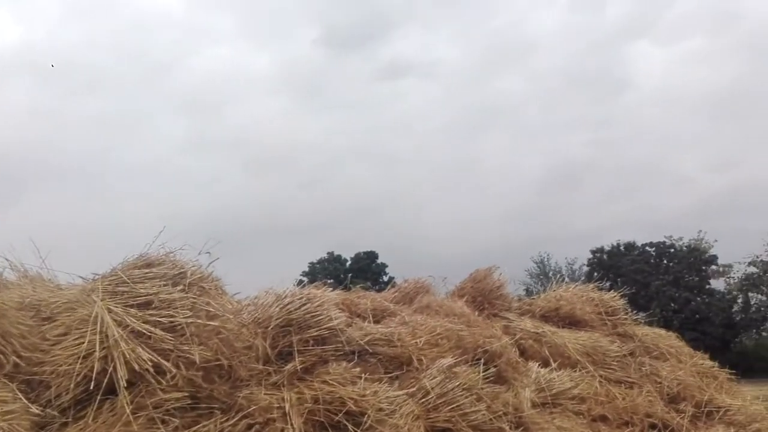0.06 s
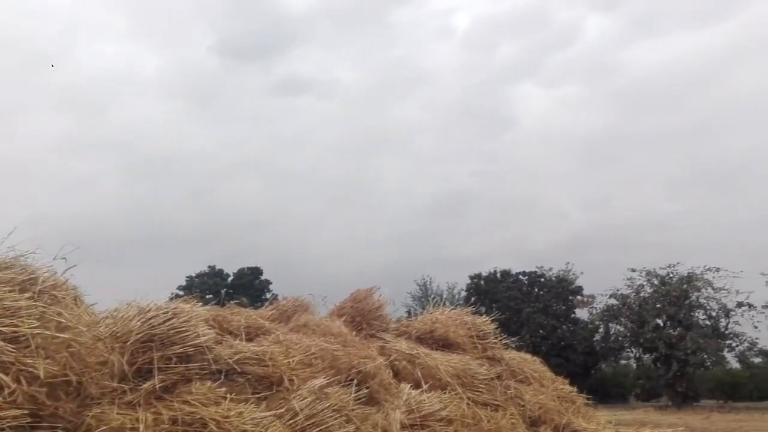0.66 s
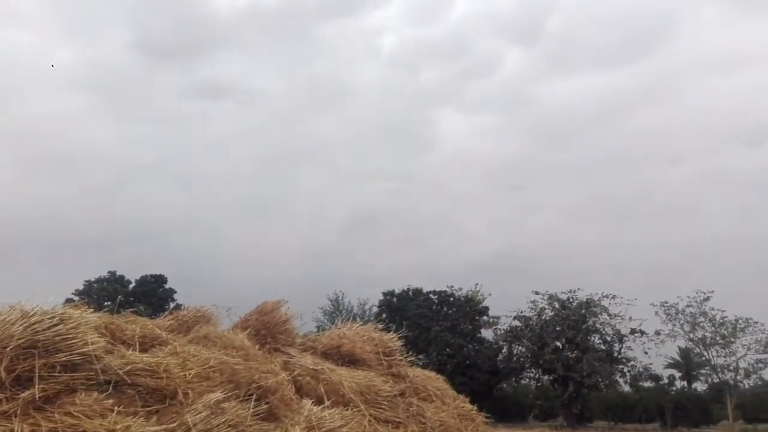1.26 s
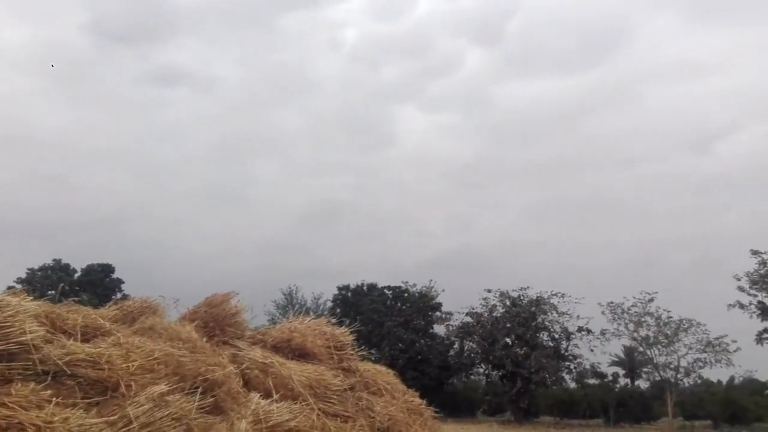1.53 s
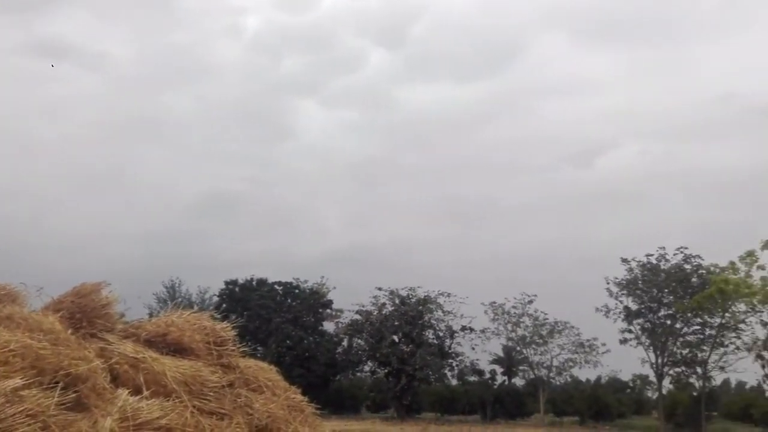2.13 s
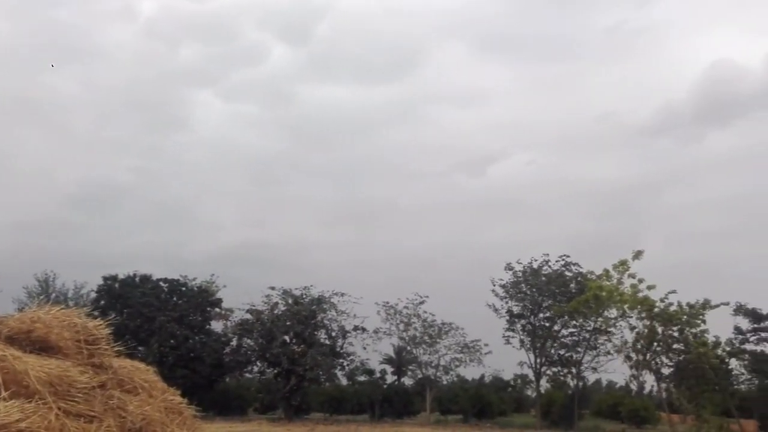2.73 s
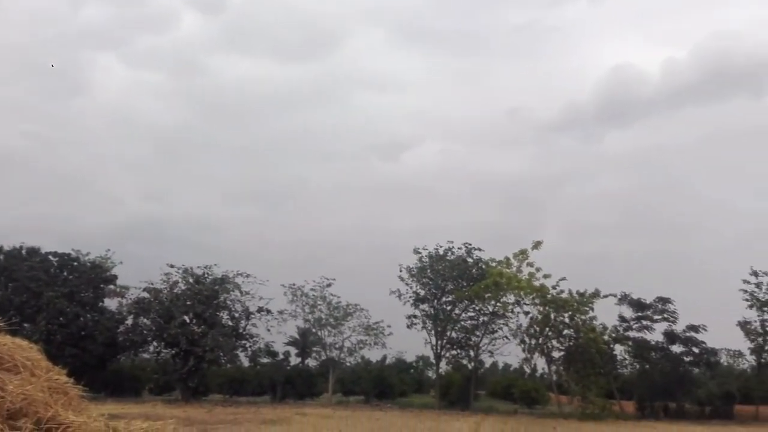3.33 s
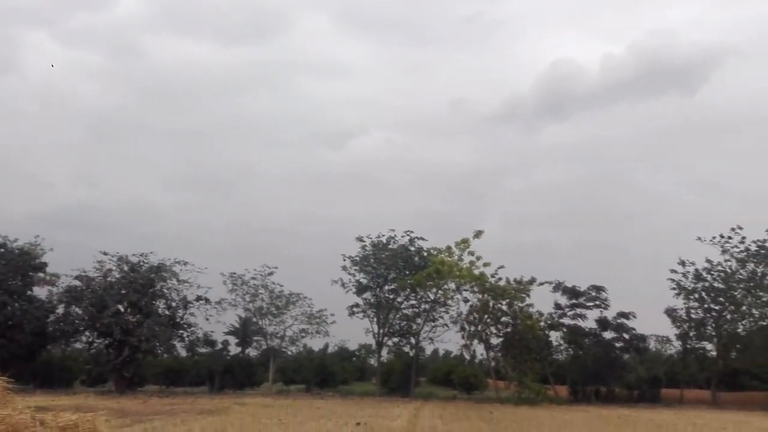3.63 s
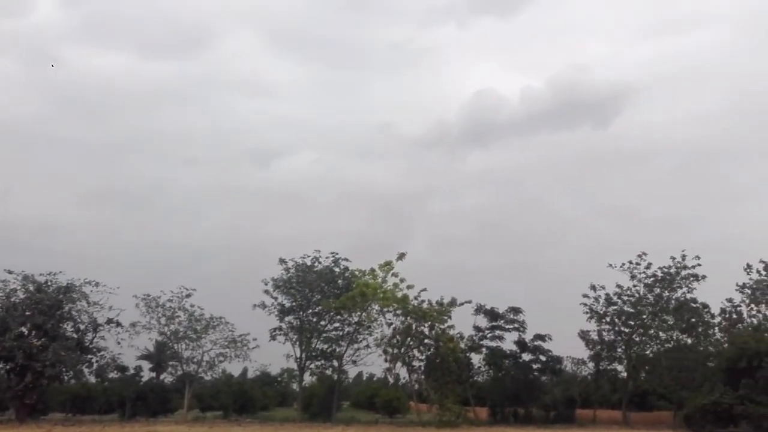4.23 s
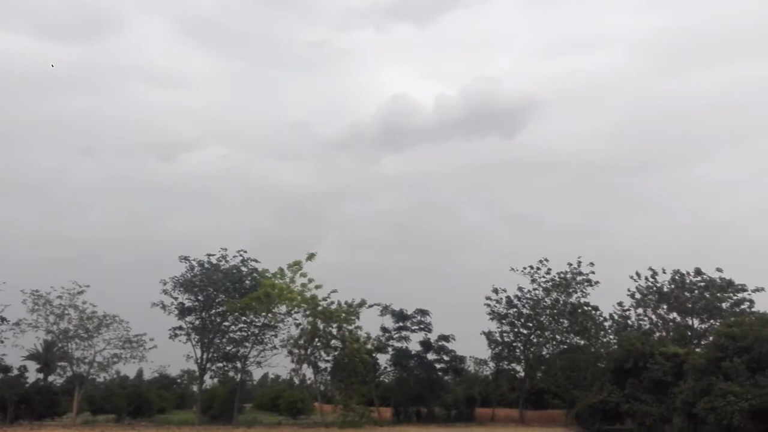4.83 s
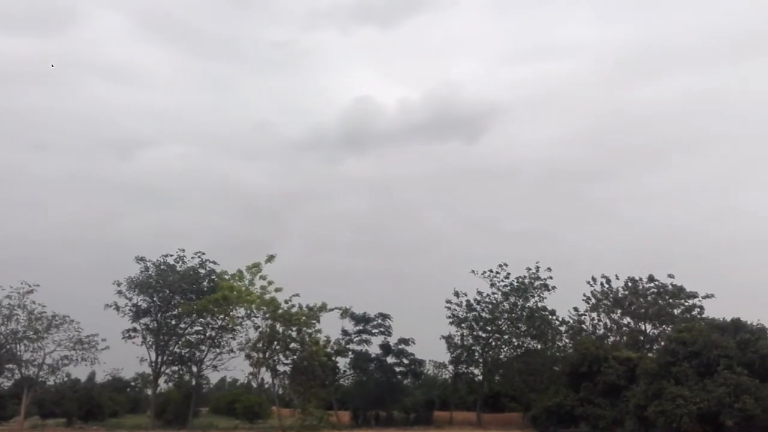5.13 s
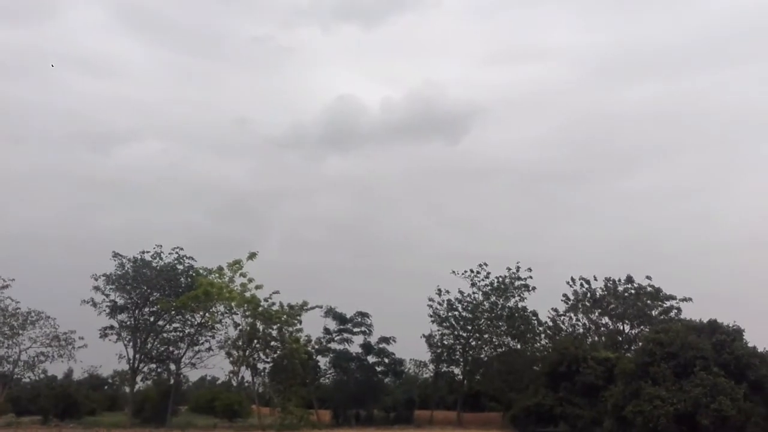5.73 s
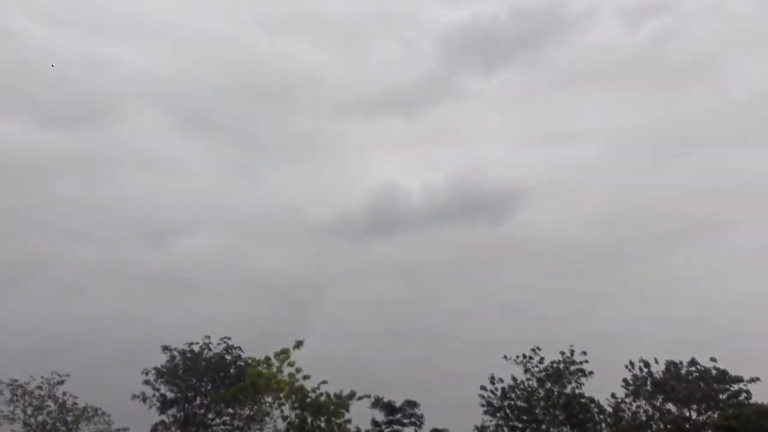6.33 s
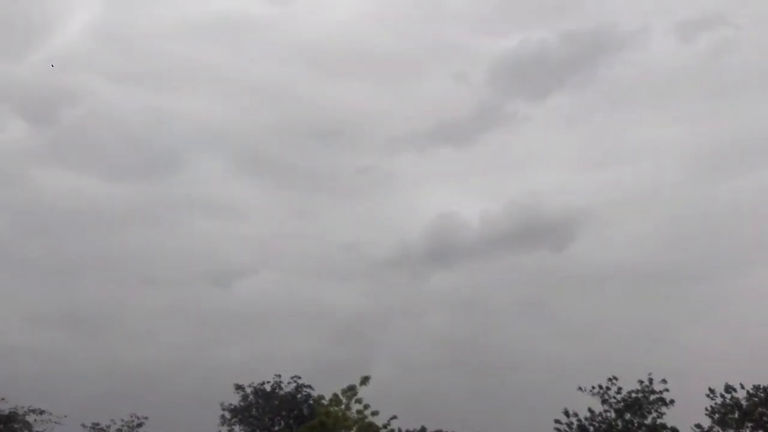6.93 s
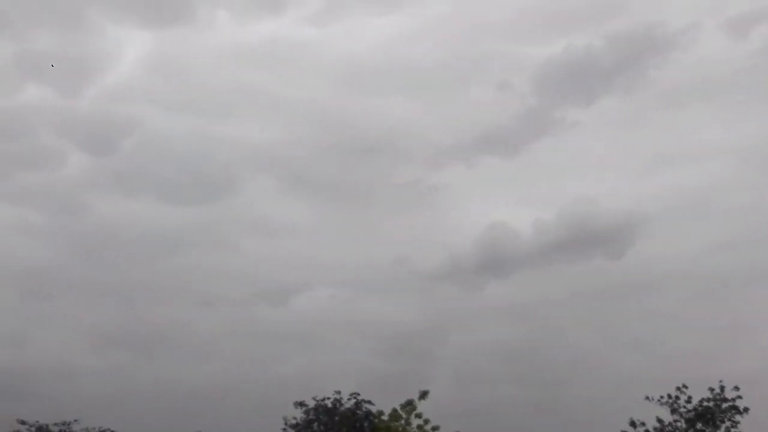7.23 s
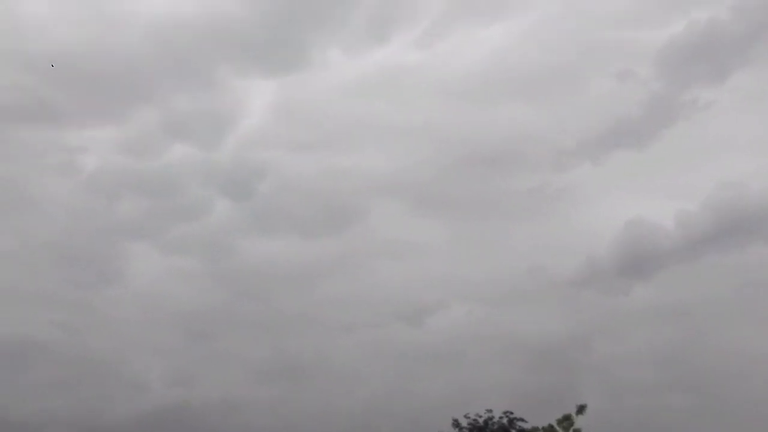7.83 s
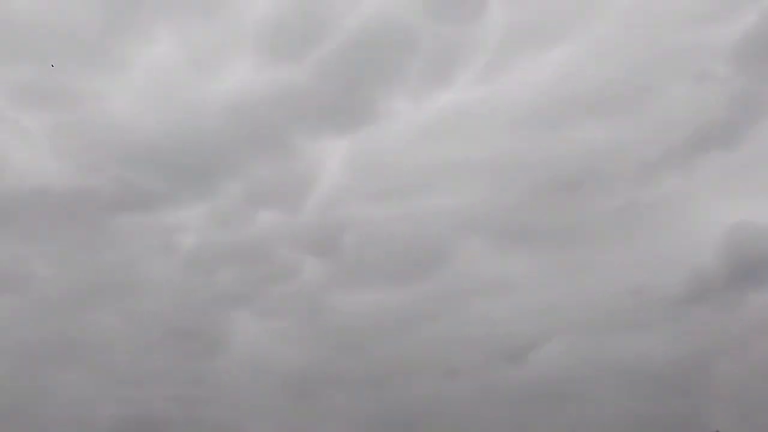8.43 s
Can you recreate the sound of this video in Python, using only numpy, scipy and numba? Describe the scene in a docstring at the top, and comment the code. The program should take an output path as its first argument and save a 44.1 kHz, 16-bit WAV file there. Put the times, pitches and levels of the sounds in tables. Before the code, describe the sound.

Close beside a working thresher in a field, a low diesel drone beats against the hum of the blower and drum. Grain showers over steel mesh in a fast, even rhythm, with crackling chaff, a faint metal ring and scattered knocks and thumps of straw. The engine's pitch drops slightly as it labours. The treble softens midway and partly returns, and light gusts rumble on the phone microphone.

```python
"""First comes the loping drone of a diesel engine, beating against a wheat thresher's blower and drum.
We stand beside the machine in an open field, with a phone for a microphone. Stalks clatter, the steel
casing rings, straw hisses from the chute and the sieve throws grain almost six times a second, while
the engine slowly sags under the load. The phone turns away and partly back, so the treble dulls and
the notches of three near reflections shift. Now and then a light breeze touches the microphone."""
import sys
import numpy as np
from scipy import signal
from scipy.fft import rfft, irfft, next_fast_len
from scipy.io import wavfile
from numba import njit

SR = 44100
rng = np.random.default_rng(int(sys.argv[2]) if len(sys.argv) > 2 else 0)


def wav_record(signal):
    """Record a signal, one row per channel, as 16-bit PCM in the file named by sys.argv[1]."""
    frames = np.transpose(np.atleast_2d(signal))
    bounded = np.clip(frames, -1, 1)
    # unit amplitude maps onto the largest positive 16-bit level
    quanta = np.round(bounded * 32767).astype(np.int16)
    wavfile.write(sys.argv[1], SR, quanta)


N = 382788
TIME = np.arange(N) / SR


def undb(db):
    """Decibels to gain."""
    return 10 ** (np.asarray(db) / 20)


def curves(table):
    """The columns of a table, joined by straight lines in time."""
    seconds, *columns = np.transpose(table)
    return [np.interp(TIME, seconds, column) for column in columns]


def unit(x):
    """Scale to rms 1."""
    return x / np.sqrt(np.mean(x ** 2))


def filtered(x, response):
    """Filter by a gain that is a function of frequency."""
    size = next_fast_len(N + 8192)
    hz = np.arange(1, size // 2 + 2) * SR / size
    return irfft(rfft(x, size) * response(hz), size)[:N]


def colour(x, spectrum):
    """Give x a spectrum of (Hz, dB) points, at rms 1."""
    hz, db = np.transpose(spectrum)
    return unit(filtered(x, lambda f: undb(np.interp(np.log(f), np.log(hz), db))))


def noise():
    """White noise."""
    return rng.standard_normal(N)


def walk(rate_hz, step=64):
    """A smooth random waver at rms 1."""
    size = next_fast_len(N // step + 2)
    hz = np.arange(size // 2 + 1) * SR / step / size
    slow = irfft(rfft(rng.standard_normal(size)) * np.exp(-(hz / rate_hz) ** 2), size)
    return unit(np.interp(np.arange(N) / step, np.arange(size), slow))


def impacts(per_second, spread_db):
    """Tiny impacts, mostly weak and a few strong."""
    hits = noise() * (rng.random(N) < per_second / SR)
    return hits * undb(spread_db * np.minimum(rng.exponential(size=N), 4))


def tones(cycles, rows, slip_rad):
    """Multiples of a shaft's phase; each wavers a little in level and timing."""
    out = 0
    for multiple, db, waver_db in rows:
        amplitude = np.sqrt(2) * undb(db + waver_db * walk(7))
        out += amplitude * np.sin(2 * np.pi * multiple * cycles + slip_rad * walk(33))
    return out


def burst(at_s, rise_s, fall_s):
    """Place and envelope of a spray of grain that lands around at_s."""
    start = int(np.clip((at_s - 0.66 * rise_s) * SR, 0, N))
    since = TIME[:min(SR // 4, N - start)]
    shape = (1 - np.exp(-(since / rise_s) ** 2)) * np.exp(-since / fall_s)
    return slice(start, start + len(since)), shape


def swells(table, spectrum):
    """Coloured noise that rises and falls once for each row."""
    envelope = sum(undb(db) * np.exp(-2 * ((TIME - start) / length - .5) ** 2)
                   for start, db, length in table)
    return colour(noise(), spectrum) * envelope


# The engine's pace under load. Each row: time in seconds, firing rate in Hz.
FIRING_RATE = [(0, 52.78), (.5, 52.15), (1, 51.28), (1.6, 50.79), (2.4, 50.33), (3.1, 50.42), (3.9, 50.5),
               (4.4, 50.15), (5, 49.76), (5.6, 49.61), (6.2, 49.49), (6.7, 48.32), (7.2, 47.37),
               (7.9, 47.31), (8.68, 47.55)]


def crank(rated_hz=50, start_firings=.14):
    """The load slows the crank: returns the running count of firings and the sag below rated speed."""
    firing_hz = curves(FIRING_RATE)[0]
    return start_firings + np.cumsum(firing_hz) / SR, rated_hz - firing_hz


# The low exhaust tones. Each row: firing multiple, level in dB at rated speed,
# change in dB per Hz of sag, waver in dB.
EXHAUST_TONES = [(1, -25, -1, 1.4), (2, -29.5, -0.56, 0.5), (3, -33.5, -0.6, 1.6), (4, -45, -0.9, 1.9)]
# The upper drone. Each row: time in seconds, levels in dB of the fifth, sixth and seventh multiples.
UPPER_TONES = [(0, -34.5, -63, -55), (1, -35, -60, -57.5), (2.7, -36, -58, -50), (4, -38.5, -62, -48),
               (5.5, -41.5, -62, -55.5), (6.4, -41, -48, -45), (7.3, -50, -48, -47.5),
               (7.8, -44.5, -50, -39.5), (8.68, -46, -51, -42.5)]


def engine(firings, sag_hz):
    """The exhaust drones on multiples of the firing rate; its low tones fade as the engine sags."""
    low = [(k, db + db_per_hz * sag_hz, waver_db) for k, db, db_per_hz, waver_db in EXHAUST_TONES]
    upper = [(k, db, 1.3) for k, db in enumerate(curves(UPPER_TONES), 5)]
    # above the pipe's resonance the tones swing the other way
    return tones(firings, low, slip_rad=0.038) - tones(firings, upper, slip_rad=0.09)


# The blower's hum. Each row: multiple of the blade rate, level in dB, waver in dB.
BLOWER_TONES = [(1, -34.5, 3), (2, -27.5, 0.5), (3, -41.5, 1.5)]
# The drum's single tone. Each row: time in seconds, level in dB.
DRUM_LEVEL = [(0, -32), (2.8, -39), (5.2, -34), (5.9, -35), (6.9, -27), (8, -30.5), (8.68, -34)]


def rotors(firings, blower_per_firing=.808, drum_per_firing=1.291, drum_lag_cycles=.22):
    """The blower sucks once per blade; belt-driven, it and the drum beat against the firings."""
    blower = tones(blower_per_firing * firings, BLOWER_TONES, slip_rad=0.065)
    drum_cycles = drum_per_firing * firings - drum_lag_cycles
    drum = tones(drum_cycles, [(1, curves(DRUM_LEVEL)[0], 1.0)], slip_rad=0.1)
    return drum - blower


# Air and stalks in the drum, heard from outside. Each row: frequency in Hz, relative level in dB.
RUMBLE_SPECTRUM = [(5, -19), (20, -7), (40, -7), (75, 6.5), (110, 1.1), (155, -1), (205, -10), (260, -9),
                   (350, -10.5), (460, -15.5), (700, -26.5), (1500, -49)]
CLATTER_SPECTRUM = [(250, -26), (460, -2.5), (550, 9), (720, 8.5), (900, 5), (1200, 1), (1600, -9.5),
                    (2100, -11.5), (3000, -12.5), (6000, -22.5), (14000, -43)]


def threshing(firings, away, sheaf_s=0.87, sheaf_half_s=0.32):
    """Churned air rumbles, louder as a big sheaf goes through; stalks clatter in the drum."""
    beat = np.cos(2 * np.pi * firings)
    sheaf = np.exp(-((TIME - sheaf_s) / sheaf_half_s) ** 2)
    rumble = colour(noise() * (1 + 0.072 * beat), RUMBLE_SPECTRUM)
    clatter = colour(impacts(7000, spread_db=2.26) * (1 + 0.016 * beat), CLATTER_SPECTRUM)
    return rumble * undb(-29 + 4.5 * sheaf) + clatter * undb(-39.5 - 2 * away + 1.36 * walk(14))


# The casing's ring. Each row: time in seconds, level in dB.
RING_LEVEL = [(0, -43), (1.6, -43.5), (3.3, -52.5), (4.2, -48.5), (5.4, -47.5), (6.8, -50), (7.5, -57),
              (8.68, -56)]


def casing_ring(centre_hz=636, width_hz=21):
    """The steel casing rings in one narrow band."""
    ring = filtered(noise(), lambda f: 1 / (1 + (2 * (f - centre_hz) / width_hz) ** 2))
    return unit(ring) * undb(curves(RING_LEVEL)[0])


# The casing's upper resonances. Each row: centre in Hz, width in Hz, relative level in dB.
PANEL_MODES = [(1598, 127, 4), (1707, 200, 4.5), (1937, 210, 0.5)]


def panel_rattle(sag_hz, level_db=-54, surge_db=1.6):
    """Kernels pelt the casing panels, which rattle in surges, a touch more as the engine labours."""
    pelting = impacts(3000, spread_db=4.3)
    rattle = filtered(pelting, lambda f: sum(undb(db) / (1 + 2j * (f - hz) / width_hz) ** 2
                                             for hz, width_hz, db in PANEL_MODES))
    return unit(rattle) * undb(level_db + 0.1 * sag_hz + surge_db * walk(18))


# The straw chute's resonances. Each row: centre in Hz, lift in dB.
CHUTE_MODES = [(2680, 2.5), (2900, 2), (3270, 0.5), (3730, 4), (4120, 3), (4500, 3.5), (4780, 3.5),
               (5180, 0), (5400, 1.5), (5790, 4.5), (6470, 2.5), (6740, 1)]


def chute(x, width_hz=68):
    """The steel chute adds narrow resonances to whatever rushes through it."""
    return filtered(x, lambda f: 1 + sum((undb(db) - 1) / (1 + 2j * (f - hz) / width_hz)
                                         for hz, db in CHUTE_MODES))


# Rushing chaff and snapping stalks. Each row: frequency in Hz, relative level in dB.
CHAFF_SPECTRUM = [(700, 6), (1600, 6), (2400, 3), (3600, -1), (5000, 0.5), (6500, -0.5), (8000, -2.5),
                  (10500, -5.5), (14000, -14.5)]
SNAP_SPECTRUM = [(500, -16), (1500, 2), (4000, 0.5), (8000, -2.5), (11000, -6), (14000, -1)]
# The straw's treble at the microphone. Each row: time in seconds, gain in dB above 8 kHz.
STRAW_TREBLE = [(0, 2), (2.6, 0), (4, -3), (6.2, -2.5), (7.2, -0.5), (7.9, 1), (8.68, 1)]


def straw(away, facing_db=-40.5, flutter_db=1.1):
    """Chaff leaves the blower in an uneven, crackling stream and stalks snap in it; it fades off axis."""
    chaff = colour(impacts(14000, spread_db=0.21), CHAFF_SPECTRUM)
    snaps = colour(impacts(320, spread_db=2.4), SNAP_SPECTRUM)
    stream = chaff + undb(-11) * snaps
    treble = filtered(stream, lambda f: 1 / (1 + (8000 / f) ** 4))
    stream = stream - treble + treble * undb(curves(STRAW_TREBLE)[0])
    return chute(stream) * undb(facing_db - 11 * away + flutter_db * walk(34))


# Handfuls of grain on steel, most as the sieve turns back. Each row: time in seconds, level in dB,
# fall in seconds, lift in dB above 7 kHz.
GRAIN_CLACKS = [(.008, -39, 0.076, -1.5), (.088, -40.5, 0.015, -6), (.15, -35.5, .012, 0),
                (.322, -35, .03, -3), (0.488, -36.5, .023, -3), (.634, -41, 0.11, 1),
                (.793, -38.5, 0.021, -2), (.968, -38, .014, -2), (1.006, -40, .022, -5),
                (1.172, -42, .013, 0), (1.82, -36, 0.012, -4), (1.868, -39, 0.021, -5),
                (2.17, -40, 0.022, 0), (2.219, -44, .053, 3), (2.342, -38, 0.017, 0),
                (2.516, -37.5, .014, -2), (2.64, -43, 0.011, -3), (2.86, -48, 0.028, 1),
                (3.025, -40, .01, -5), (3.202, -40, .015, 3), (3.24, -41, .022, -2), (3.381, -37, .008, 2),
                (3.553, -34, 0.0084, -4), (3.724, -37, .01, 4), (3.897, -39, 0.0068, 1),
                (4.071, -34, 0.007, -3), (4.246, -36.5, .009, -5), (4.416, -39, .011, -3),
                (4.59, -39.5, .009, 3), (4.761, -42, .014, -1), (4.939, -40, .009, 3),
                (5.118, -36.5, .008, 0), (5.303, -34, .0074, -4), (5.34, -42, .01, -2),
                (5.468, -44, 0.0086, 4), (5.642, -37, .009, -2), (5.818, -34.5, 0.0076, -1),
                (5.994, -37, 0.0076, -5), (6.173, -40, .008, 2), (6.354, -35.5, .009, -5),
                (6.584, -41, .008, -3), (6.705, -39.5, .009, -2), (6.89, -40, .008, -2),
                (7.073, -34, .009, 0), (7.253, -36, 0.011, 1), (7.437, -39.5, 0.01, -1),
                (7.49, -42.5, .025, 0), (7.615, -38, .0085, 5), (7.802, -42, 0.01, 11),
                (7.988, -38, .009, 4), (8.172, -34.5, .009, 5), (8.254, -35, 0.0086, 6),
                (8.371, -31, .007, 4), (8.407, -43.5, 0.055, 3), (8.611, -36, .015, -1)]
# Their colour. Each row: frequency in Hz, relative level in dB.
CLACK_SPECTRUM = [(500, -9), (1500, 5.5), (3000, 15.5), (4500, 15), (6500, 14.5), (8500, 6.5), (11000, 6),
                  (14000, -10)]


def clacks(rise_s=.0035):
    """Grain slaps the steel: a sharp crack and a short spray, each with its own brightness."""
    spray = colour(impacts(16000, spread_db=1.0), CLACK_SPECTRUM)
    dull = filtered(spray, lambda f: 1 / (1 + (f / 7000) ** 6))
    treble = spray - dull
    out = np.zeros(N)
    for at_s, db, fall_s, treble_db in GRAIN_CLACKS:
        span, shape = burst(at_s, rise_s, fall_s)
        out[span] += undb(db) * shape * (dull[span] + undb(treble_db) * treble[span])
    return out


# Grain lands three times a stroke. Each row: delay in seconds, relative level in dB,
# rise and fall in seconds.
GRAIN_LANDINGS = [(0, 0.5, 0.018, 0.03), (0.043, 3, 0.028, 0.028), (.115, -18.5, .008, .015)]
# Grain on the mesh. Each row: frequency in Hz, relative level in dB.
GRAIN_SPECTRUM = [(500, 3), (1500, 22), (3000, 14), (4500, 12), (6500, 10), (8500, 5.5), (11000, 1),
                  (14000, -15)]


def sieve(firings, sag_hz, away, firings_per_stroke=8.729, facing_db=-34.5, scatter_db=1.0):
    """Geared to the engine, each stroke showers grain over the steel mesh, more as the engine labours."""
    stroke_firings = np.arange(6.7, firings[-1], firings_per_stroke)
    power = np.zeros(N)
    for stroke_s in np.interp(stroke_firings, firings, TIME):
        for delay_s, db, rise_s, fall_s in GRAIN_LANDINGS:
            span, shape = burst(stroke_s + delay_s, rise_s, fall_s)
            power[span] += (undb(db + scatter_db * rng.standard_normal()) * shape) ** 2
    shower = colour(impacts(22000, spread_db=0.83), GRAIN_SPECTRUM)
    return shower * np.sqrt(power) * undb(facing_db - 6 * away + 0.4 * sag_hz)


# Stalks on the casing. Each row: start in seconds, level in dB, length in seconds.
STALK_KNOCKS = [(.126, -36.5, .016), (1.879, -39, 0.019), (2.23, -37.5, 0.017), (2.519, -44, .016),
                (2.679, -39.5, .016), (3.377, -38.5, .016), (3.555, -43, 0.018), (4.13, -41, 0.019),
                (4.304, -39.5, 0.014), (5.052, -44, 0.014), (5.114, -45, .016), (5.354, -39.5, .016),
                (6.353, -43, 0.018), (6.525, -41, 0.014), (6.584, -43, .016), (8.168, -41, 0.014)]
# Their colour. Each row: frequency in Hz, relative level in dB.
KNOCK_SPECTRUM = [(300, -32), (600, -2), (1000, 0), (1700, -3.5), (2400, -11), (4000, -22), (10000, -50)]


def stalk_knocks():
    """Stalks strike the casing in short midrange knocks."""
    return swells(STALK_KNOCKS, KNOCK_SPECTRUM)


# Bunched straw inside the machine. Each row: start in seconds, level in dB, length in seconds.
STRAW_THUMPS = [(.64, -24, 0.024), (.693, -19, 0.033), (.75, -21, 0.0095), (.845, -24.5, 0.035),
                (1.068, -16.5, 0.013), (1.125, -23, 0.015), (3.7, -34, 0.018), (3.85, -30, 0.042),
                (4.98, -28, 0.028), (6.29, -26.5, 0.026), (7.44, -34.5, 0.076)]
# Their colour. Each row: frequency in Hz, relative level in dB.
THUMP_SPECTRUM = [(40, -24), (90, -6), (160, 13.5), (250, -7), (420, -3), (600, -16), (1500, -48),
                  (4000, -80)]


def straw_thumps():
    """Bunches of straw go through with dull thumps."""
    return swells(STRAW_THUMPS, THUMP_SPECTRUM)


# Gusts right on the microphone. Each row: start in seconds, level in dB, length in seconds.
BREEZE_GUSTS = [(1.35, -24, 0.53), (4.9, -24, 0.1), (5.15, -25.5, 0.18), (6.48, -27, 0.075),
                (8.48, -21, 0.085)]
# Their colour. Each row: frequency in Hz, relative level in dB.
BREEZE_SPECTRUM = [(6, -10), (18, -2), (35, 9), (70, 7.5), (120, -4), (200, -5), (400, -35), (1500, -80)]


def breeze():
    """A light breeze off the field buffets the microphone with low rumbles."""
    return swells(BREEZE_GUSTS, BREEZE_SPECTRUM)


# Three quick squeaks. Each row: middle and length in seconds, pitch in Hz, glide in Hz per second,
# level in dB.
FAINT_SQUEAKS = [(2.295, .018, 3170, 2000, -47), (2.349, .018, 3270, 1000, -47),
                 (2.373, .026, 3200, 4000, -47)]


def squeaks():
    """Faint, short chirps, each rising in pitch."""
    out = 0
    for middle_s, length_s, hz, glide_hz_per_s, db in FAINT_SQUEAKS:
        since = TIME - middle_s
        envelope = np.exp(-(2 * since / length_s) ** 2)
        cycles = since * (hz + glide_hz_per_s * since / 2)
        out += np.sqrt(2) * undb(db) * envelope * np.sin(2 * np.pi * cycles)
    return out


# Whines under the din. Each row: start and end in seconds, first and target pitch in Hz, level in dB.
THIN_WHINES = [(4.135, 4.55, 688, 671, -48), (4.783, 5.2, 567, 556, -49), (6.511, 6.986, 1140, 1203, -50.5),
               (6.802, 7.2, 694, 683, -46), (7.12, 7.637, 700, 692, -46)]


def whines(glide_s=0.134, fade_s=0.073, waver_db=0.5):
    """Thin, faint tones come and go, gliding a little and wavering."""
    drift = 1 + 0.0061 * walk(24)
    out = 0
    for start, end, first_hz, target_hz, db in THIN_WHINES:
        glide = np.exp(-np.maximum(TIME - start, 0) / glide_s)
        hz = drift * (target_hz + (first_hz - target_hz) * glide)
        fade = np.clip(np.minimum(TIME - start, end - TIME) / fade_s, 0, 1)
        out += np.sqrt(2) * undb(db) * fade * np.sin(2 * np.pi * np.cumsum(hz) / SR)
    return out * undb(waver_db * walk(20))


def echo(x, path, low_hz, high_hz):
    """One near surface returns a band of the sound, with a shifting delay and strength."""
    delay_ms, strength = curves(path)
    band = filtered(x, lambda f: 1 / (1 + (low_hz / f) ** 4) / (1 + (f / high_hz) ** 4))
    return strength * np.interp(TIME - delay_ms / 1000, TIME, band)


# Three paths to the microphone, each less than a metre longer than the direct one.
# Each row: time in seconds, delay in milliseconds, strength from 0 to 1.
INVERTED_PATH = [(0, 1.09, 0.33), (2.3, 1.01, 0.35), (3.201, .99, .13), (4.3, .96, 0.35), (5.7, 0.86, 0.26),
                 (7.1, .92, 0.32), (7.8, 1.03, .2), (8.68, 0.94, 0.13)]
UPRIGHT_PATH = [(0, 1.75, 0.14), (1.2, 1.54, .1), (2.3, 1.28, 0.27), (2.9, 1.15, .06), (3.5, 0.81, .12),
                (4.4, 0.72, 0.24), (5, .62, 0.23), (5.8, 0.45, .02), (7.1, 0.62, .22), (7.8, .79, .12),
                (8.68, .8, .02)]
BRIGHT_PATH = [(0, 0.84, .1), (1.5, 1.04, .17), (2.7, 0.86, .08), (3.6, .94, .02), (5.6, 1.016, 0.22),
               (7.2, 1.14, .02), (8.68, 1.25, .05)]


def reflections(x):
    """Three near reflections cut notches that move as the phone turns."""
    inverted = echo(x, INVERTED_PATH, low_hz=680, high_hz=3940)
    upright = echo(x, UPRIGHT_PATH, low_hz=533, high_hz=5100)
    bright = echo(x, BRIGHT_PATH, low_hz=1200, high_hz=6200)
    return x - inverted + upright + bright


@njit
def moving_bandpass(x, hz, width):
    """State-variable band-pass with a moving centre; width is a share of the centre."""
    out = np.empty(len(x))
    band_state, low_state = 0., 0.
    for i in range(len(x)):
        g = np.tan(np.pi * hz[i] / SR)
        band = (band_state + g * (x[i] - low_state)) / (1 + g * (g + width))
        band_state = 2 * band - band_state
        low_state += 2 * g * band
        out[i] = width * band
    return out


# A midrange hollow at the microphone. Each row: time in seconds, centre in Hz, gain there in dB.
HOLLOW_SWEEP = [(0, 346, -3), (1.4, 485, -5.5), (2.8, 570, -2.5), (3.5, 685, -1.5), (4.2, 882, -5.5),
                (5.4, 1250, 1.5), (6.3, 1330, 0.5), (7, 1020, -0.5), (7.6, 816, -4.5), (8.2, 625, -7),
                (8.68, 542, -2)]


def hollow(x):
    """A broad dip sweeps up and back with the turn, filling in to a slight lift at the top."""
    centre_hz, db = curves(HOLLOW_SWEEP)
    return x - (1 - undb(db)) * moving_bandpass(x, centre_hz, width=0.29)


# The microphone's aim. Each row: time in seconds, turn from 0 (facing the machine) to 1 (most away).
MICROPHONE_TURN = [(0, 0), (1.3, .21), (2.4, .37), (4, .77), (5.5, 1), (6.4, .98), (7.3, .84), (8.6, .45)]


def scene():
    """One engine drives the whole thresher, heard in mono from a slowly turning phone beside it."""
    firings, sag_hz = crank()
    away = curves(MICROPHONE_TURN)[0]
    machine = engine(firings, sag_hz) + rotors(firings)
    machine += threshing(firings, away) + casing_ring() + panel_rattle(sag_hz) + straw(away)
    machine += clacks() + sieve(firings, sag_hz, away) + stalk_knocks() + straw_thumps()
    return (hollow(reflections(machine)) + breeze() + squeaks() + whines())[None]


def record(dry):
    """The phone cuts the top steeply above 14150 Hz."""
    return signal.sosfilt(signal.ellip(12, .1, 80, 14150, fs=SR, output="sos"), dry)


dry = scene()
out = record(dry)
wav_record(out)
```